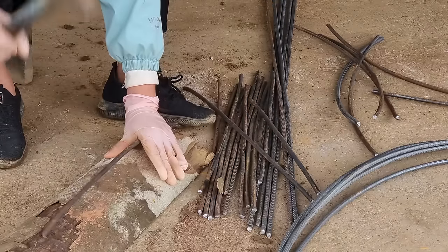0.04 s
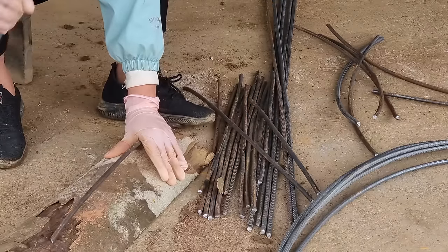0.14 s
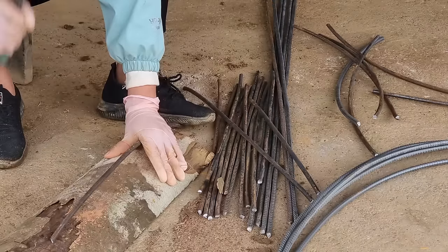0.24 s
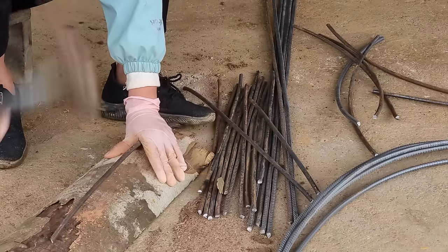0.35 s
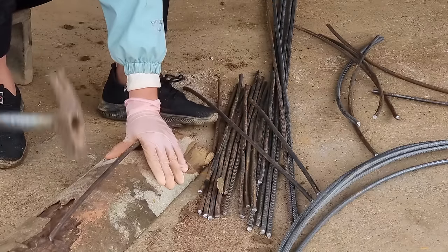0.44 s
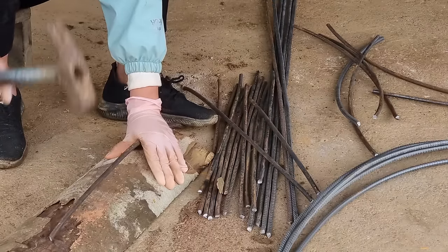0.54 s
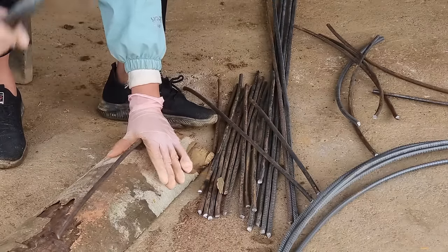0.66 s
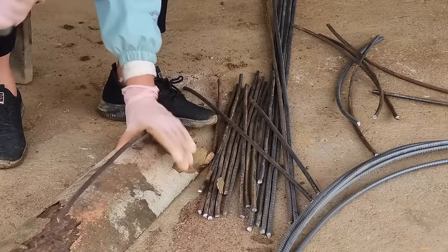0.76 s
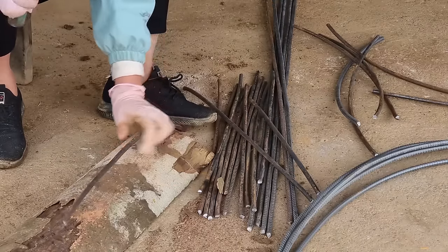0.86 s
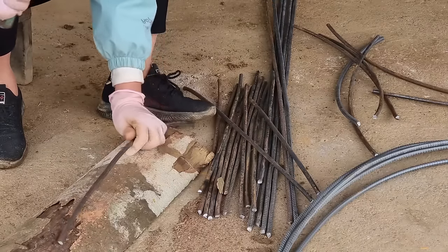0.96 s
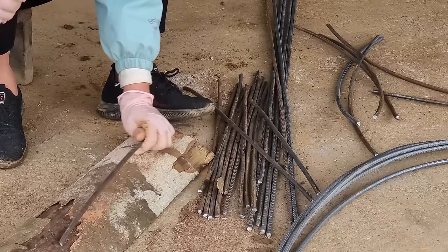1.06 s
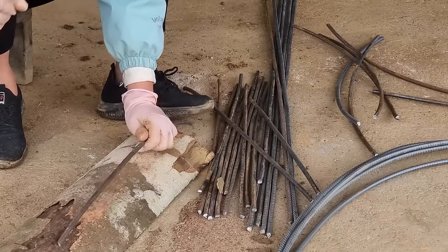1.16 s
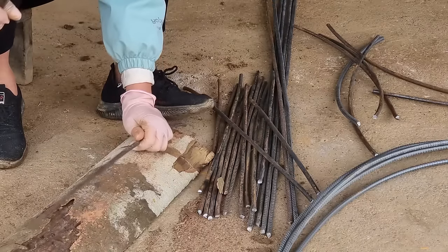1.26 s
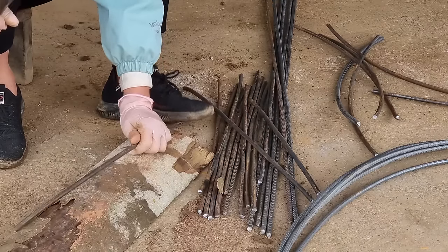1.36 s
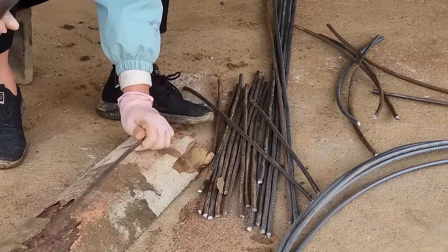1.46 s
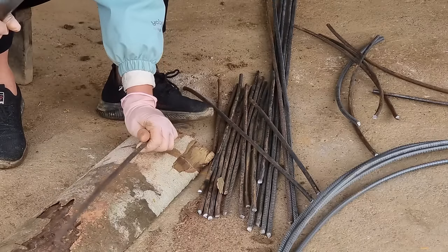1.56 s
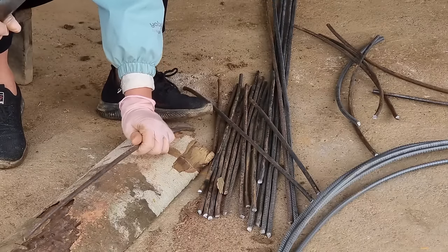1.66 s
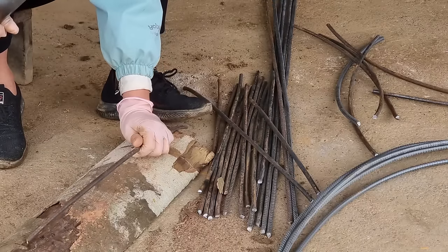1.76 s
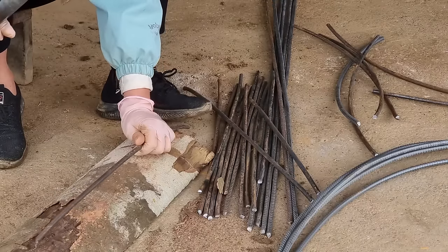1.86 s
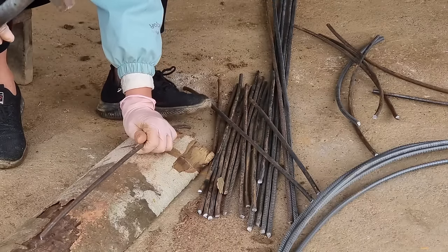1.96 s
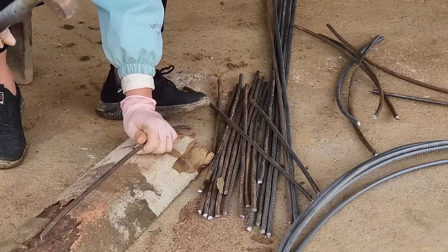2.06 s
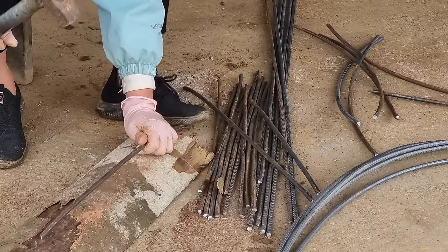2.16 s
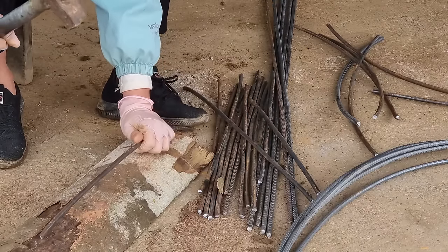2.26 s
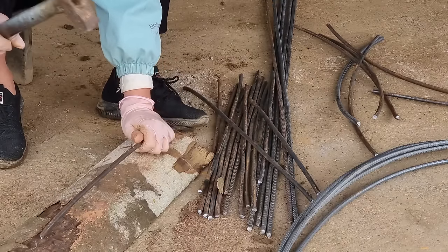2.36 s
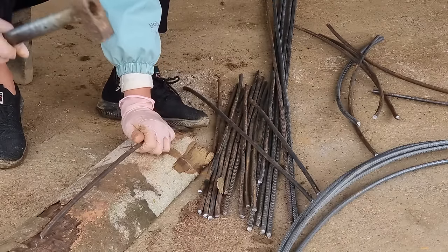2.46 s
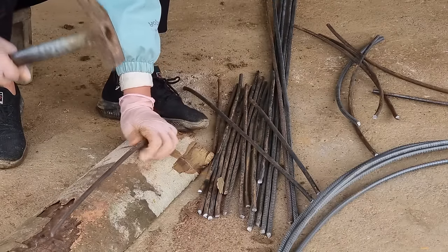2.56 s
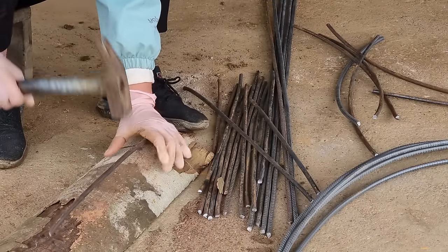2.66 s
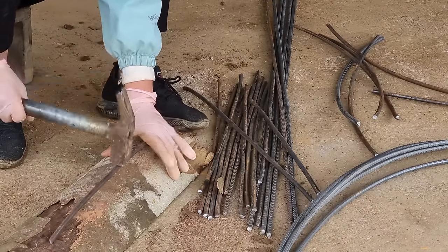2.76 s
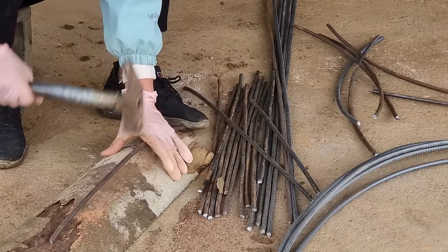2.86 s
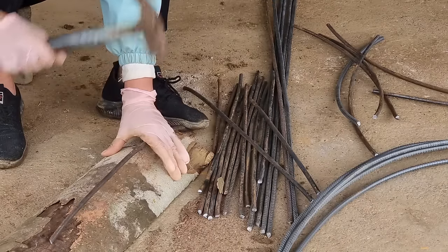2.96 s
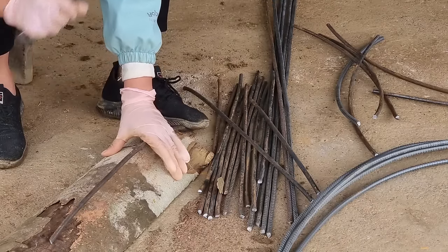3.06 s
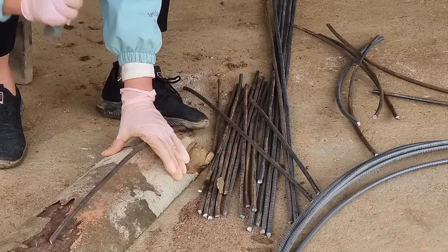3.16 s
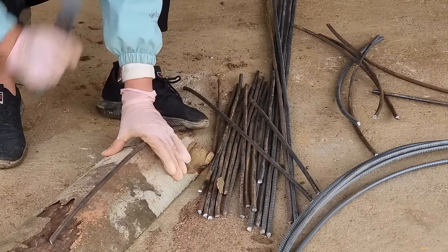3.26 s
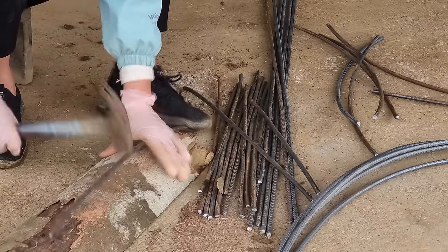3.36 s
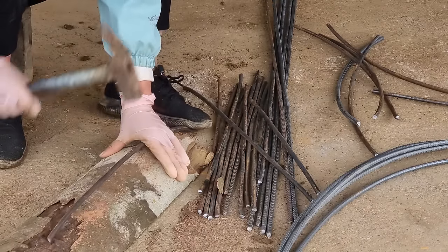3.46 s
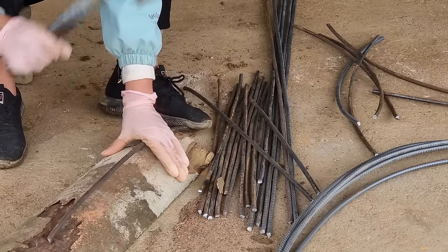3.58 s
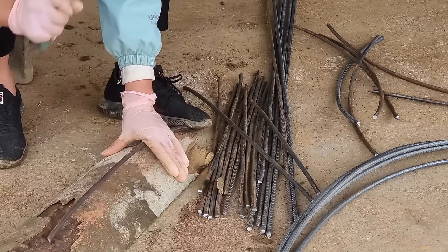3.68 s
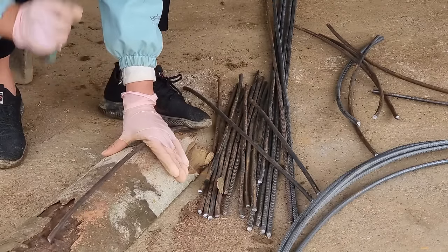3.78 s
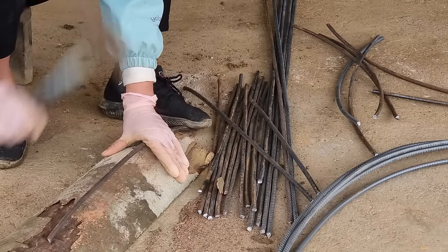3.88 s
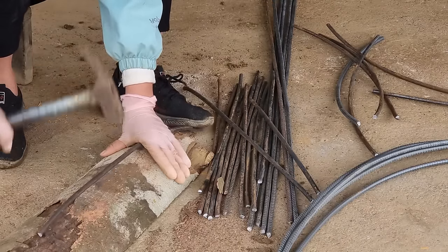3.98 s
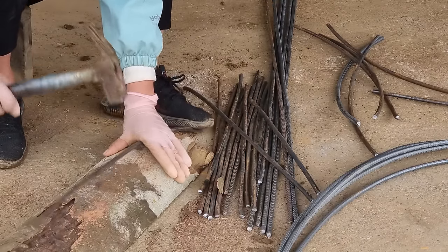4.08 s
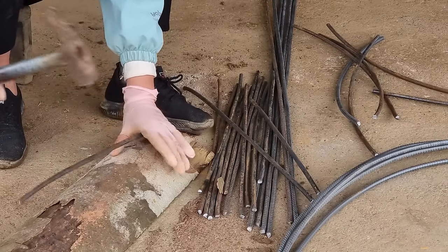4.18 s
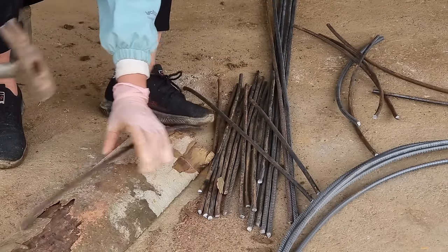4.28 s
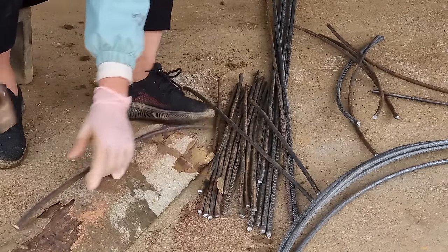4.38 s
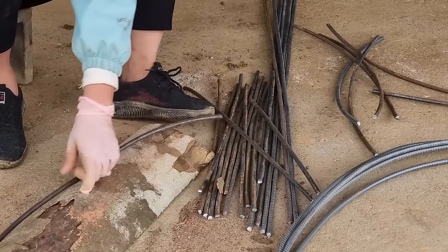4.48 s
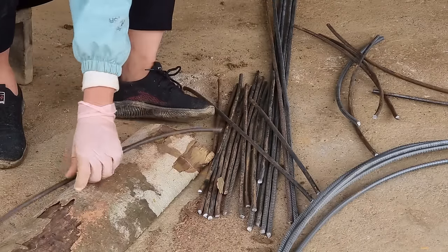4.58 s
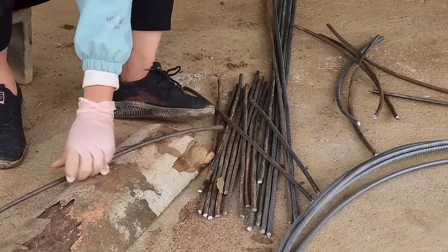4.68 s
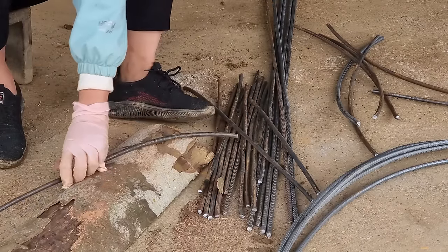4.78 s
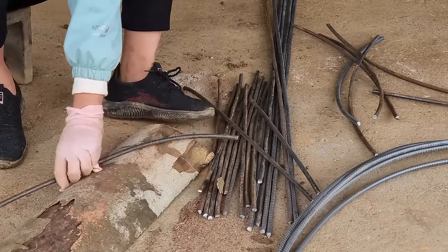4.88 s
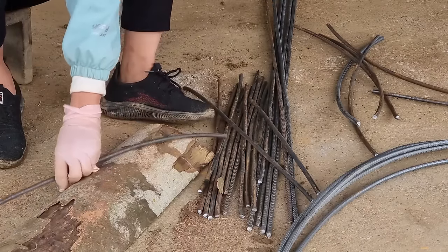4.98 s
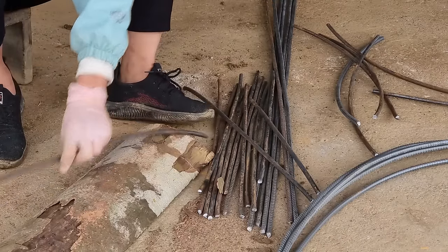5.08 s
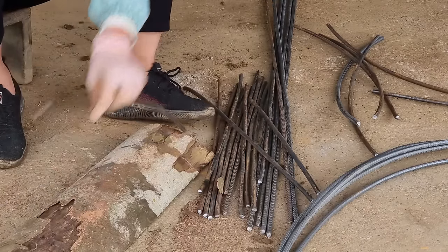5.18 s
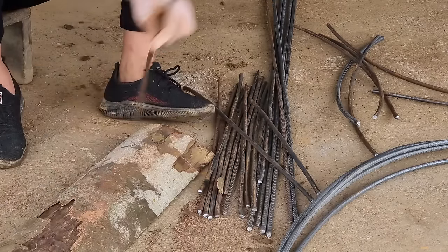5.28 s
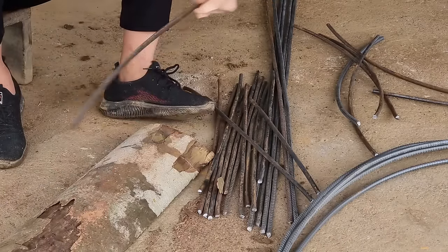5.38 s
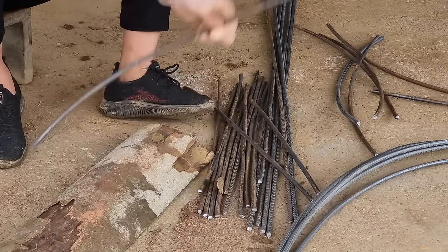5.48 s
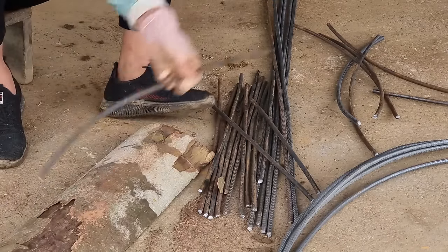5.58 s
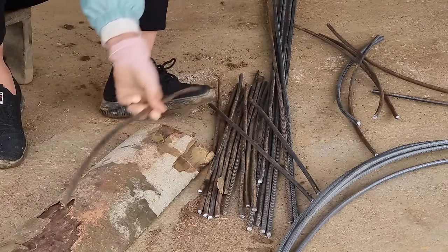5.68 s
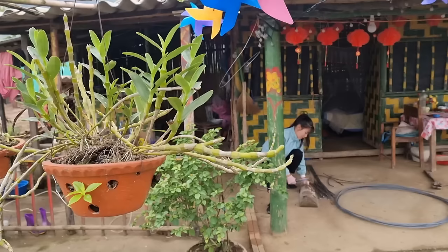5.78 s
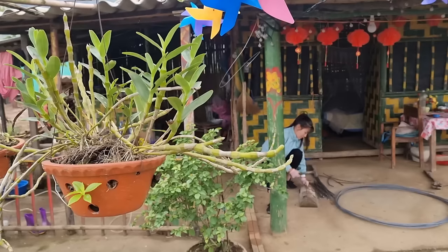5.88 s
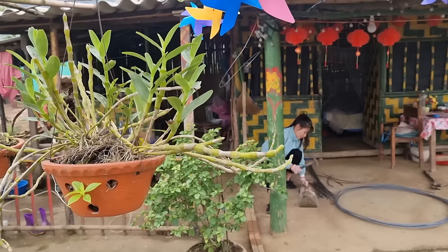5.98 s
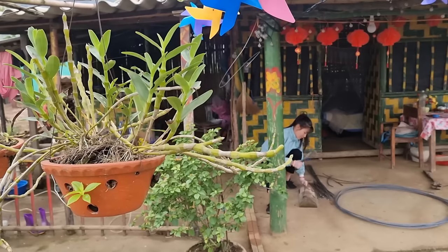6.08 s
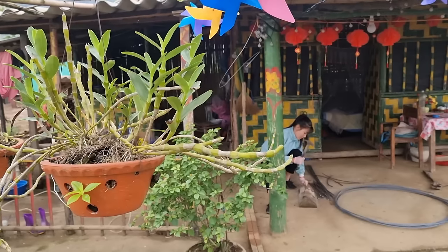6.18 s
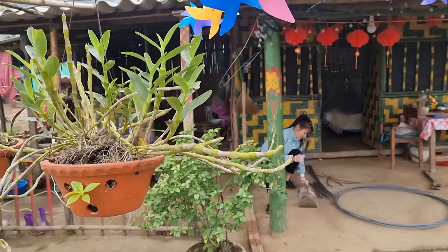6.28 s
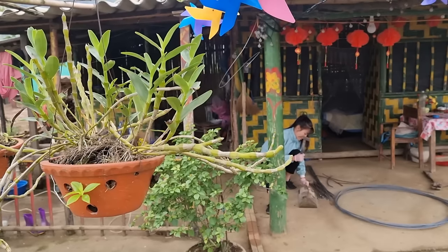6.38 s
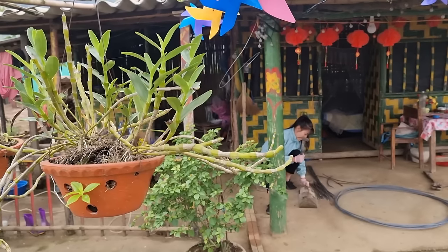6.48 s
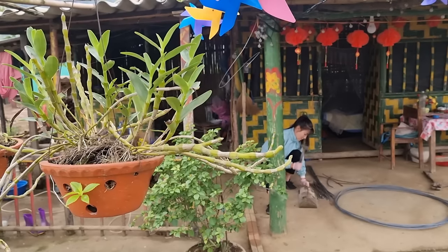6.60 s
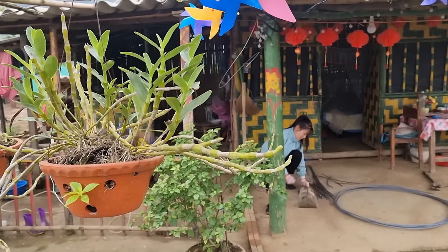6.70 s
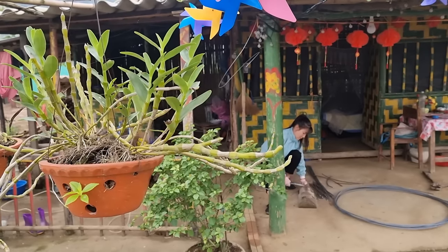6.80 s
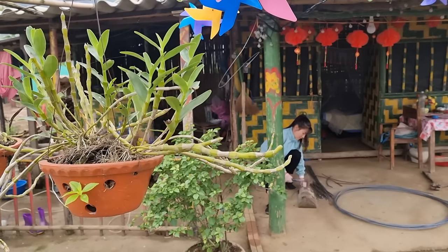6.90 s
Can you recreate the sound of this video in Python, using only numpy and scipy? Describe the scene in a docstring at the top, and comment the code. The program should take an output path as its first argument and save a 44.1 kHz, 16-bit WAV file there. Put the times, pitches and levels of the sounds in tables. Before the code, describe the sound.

Irregular hard hammer blows make a steel rod chatter on wood; it drags away ringing, then quieter yard air, a far bird, one more blow.

```python
"""Over a faint low rumble and open air, glove and sleeve brush and a steel reinforcing rod is tapped on a log.
A hammer straightens it: filtered noise and ringing modes make each blow chatter on the wood. The rod is turned,
dragged off the log ringing as beating sines, and laid down. The sound drops out briefly and the scene changes:
the work is heard from across the yard, where a far bird, one gliding sine, calls and the hammer falls again."""
import sys
import numpy as np
from scipy import signal
from scipy.fft import rfft, irfft, next_fast_len
from scipy.io import wavfile
from scipy.ndimage import uniform_filter1d, map_coordinates

SR = 44100
rng = np.random.default_rng(int(sys.argv[2]) if len(sys.argv) > 2 else 0)


def int16_out(signal):
    """Quantize to a 16-bit WAV file."""
    q = np.round(np.clip(np.atleast_2d(signal).T, -1, 1) * 32767)
    wavfile.write(sys.argv[1], SR, q.astype(np.int16))


N = 306054

# Noise spectrum of rod clattering on wood. Each row: frequency in Hz, relative density in dB per Hz.
CLATTER_SPECTRUM = [(29, -49.5), (50, -15.5), (198, -14), (461, -19.5), (572, -11.5), (842, -8), (1210, -5),
                    (1700, -8.5), (2110, -10.5), (2440, -9), (5670, -24), (7950, -27.5), (12900, -27),
                    (16000, -31.5)]
# Noise spectrum of gritty rubbing. Each row: frequency in Hz, relative density in dB per Hz.
GRIT_SPECTRUM = [(1180, -30), (2000, -3), (3710, -6), (5160, -4.5), (6760, -11), (14300, -13.5),
                 (16000, -17)]

PAUSE_START_S, PAUSE_END_S = 5.742, 5.799
# The two listening places: lead of the left port (s), L-R (dB), treble slope of a blow (dB/octave),
# clatter against crack (dB), stretch of a tap's decay, mean levels of the yard (dB)
NEAR = dict(lead_s=8e-5, pan_db=.5, slope_db=2.5, clatter_db=-6.5, stretch=0.99,
            rumble_db=-65, air_db=-72, hiss_db=-76)
FAR = dict(lead_s=-0.000086, pan_db=-1.5, slope_db=0.7, clatter_db=-2, stretch=1.41,
           rumble_db=-69.5, air_db=-73.5, hiss_db=-86.5)


def amp(db):
    """Decibels to gain."""
    return 10 ** (np.asarray(db) / 20)


def unit(x):
    """Scaled to rms 1."""
    return x / np.sqrt(np.mean(x ** 2) + 1e-20)


def wobble(rate, size=N):
    """A smooth random curve, rate knots a second."""
    knots = rng.standard_normal(int(size * rate / SR) + 4)
    return map_coordinates(knots, [np.arange(size) * rate / SR])


def filtered(x, response):
    """x times a response of frequency."""
    n = x.shape[-1]
    m = next_fast_len(n + 8192)
    return irfft(rfft(x, m) * response(np.fft.rfftfreq(m, 1 / SR)), m)[..., :n]


def noise(spectrum, apart, size=N):
    """Stereo noise of rms 1; apart is the side-to-mid ratio in the treble, shrinking for long waves."""
    f, db = np.transpose(spectrum)

    def colour(hz):
        gain = amp(np.interp(np.log(hz + 1), np.log(f + 1), db))
        return gain * [np.ones_like(hz), apart * (hz + 130) / (hz + 600)]
    mid, side = filtered(rng.standard_normal((2, size)), colour)
    return unit(np.array([mid + side, mid - side]))


def gesture(s, rise, hold, t60):
    """An envelope that rises from time s, starts to die away hold seconds after s, and falls 60 dB per t60."""
    age = np.arange(N) / SR - s
    return np.clip(age / rise, 0, 1) * amp(-60 * np.maximum(age - hold, 0) / t60)


def add(track, sound, s):
    """Mix a sound in from time s."""
    start = round(s * SR)
    part = sound[:, max(-start, 0):N - start]
    track[:, max(start, 0):][:, :part.shape[1]] += part


def place(s):
    """The work is heard from close by before the brief silence and from across the yard after it, when the
    scene changes."""
    return NEAR if s < PAUSE_START_S else FAR


def placed(sound, s):
    """The nearer port hears the work sooner and louder."""
    spot, ports = place(s), np.array([[.5], [-.5]])
    advanced = filtered(sound, lambda hz: np.exp(2j * np.pi * hz * spot["lead_s"] * ports))
    return advanced * amp(spot["pan_db"] * ports)


def crowded(x, depth_db, spacing_hz):
    """A long ribbed rod has many more weak resonances than the named ones: they make the spectrum jagged."""
    def peaks(hz):
        knot = np.log1p(hz / 3000) * 3000 / spacing_hz  # they lie further apart in the treble
        return amp(depth_db * map_coordinates(rng.standard_normal(int(knot[-1]) + 4), [knot]))
    return unit(filtered(x, peaks))


def slapping(x, note_hz):
    """The loose span slaps the wood, which broadens its note to a hump in the clatter's spectrum."""
    height_db, half_width_octaves = 5.5, 0.16

    def hump(hz):
        octaves = np.log2((hz + 1) / note_hz)
        return amp(height_db * np.exp(-.5 * (octaves / half_width_octaves) ** 2))
    return unit(filtered(x, hump))


def voiced(sound, levels_db, slope_db):
    """Where and how hard the rod is hit sets each register (thud, knock, ring, clank, sizzle) and treble slope."""
    # Upper edges of all registers but the top one. Each entry: frequency in Hz.
    edges_hz = [450, 900, 1700, 4000]
    out = 0
    rest = filtered(sound, lambda hz: amp(slope_db * np.log2(np.maximum(hz / edges_hz[-1], 1))))
    for edge, db in zip(edges_hz + [SR], levels_db):
        band = filtered(rest, lambda hz: 1 / (1 + (hz / edge) ** 12))
        rest = rest - band
        loudest = uniform_filter1d(np.mean(band ** 2, axis=0), size=1024).max()
        out = out + band * amp(db) / np.sqrt(loudest)
    return out


def ringing(t, hold, t60, note_hz, note_db, scatter_db=3, apart=1.0):
    """Rod and log ring as decaying sines, out of phase between ports; chatter feeds them for hold seconds."""
    # Modes of the log on the ground (lowest four) and the rod on it. Each row: frequency in Hz, mean level in dB.
    log_modes = [(72, -16.5), (135, -14.5), (205, -14.5), (310, -20.5), (579, -5.5), (680, -8.5),
                 (934, -10.5), (1012, -11), (1092, -3), (1176, -9.5), (1255, 6), (1330, -8.5), (1445, -1.5),
                 (1586, -6.5), (1862, -10), (2004, -6.5), (2130, -6), (2299, -6), (2718, -12.5),
                 (3100, -10.5), (3408, -21.5), (4404, -22), (4700, -16.5), (6350, -23.5), (10500, -22.5),
                 (12550, -17), (13134, -22)]
    out, age = 0, np.maximum(t, 0)
    for hz, db in [*log_modes, (note_hz, note_db)]:
        ports = apart * rng.standard_normal((2, 1)) * hz / (hz + 500)
        blur = (.3 + 1.1 * (age < hold)) * wobble(70, size=len(t))  # slaps on the wood disturb the phase
        phase = rng.uniform(0, 2 * np.pi) + ports + uniform_filter1d(blur, size=128)
        level = amp(db + scatter_db * rng.standard_normal())
        out = out + level * np.sin(2 * np.pi * hz * age + phase)
    decay = amp(-60 * (age - 0.46 * np.minimum(age, hold)) / t60)  # slower while fed
    return out * decay * (1 - np.exp(-age / 0.00042))


def yard():
    """A low distant rumble, open air and a thin hiss: noises of fixed mean level at each listening place."""
    # Noise spectra of rumble, air and hiss. Each row: frequency in Hz, relative density in dB per Hz.
    rumble_spectrum = [(12, -28), (20, -2), (38, -4), (70, 3), (130, -4.5), (161, -6.5), (187, -8.5),
                       (214, -14), (262, -20), (500, -26), (650, -59), (1100, -120)]
    air_spectrum = [(150, -27), (250, 0.5), (458, -12), (529, -8.5), (869, -5.5), (4500, -21),
                    (5850, -46.5), (9900, -120)]
    hiss_spectrum = [(1760, -30), (3000, -4), (7250, -4), (9800, -7.5), (14800, -7.5), (16000, -12)]
    near = np.arange(N) / SR < PAUSE_START_S
    level = lambda name: amp(np.where(near, NEAR[name], FAR[name]))
    rumble = level("rumble_db") * amp(1.3 * wobble(4.6)) * noise(rumble_spectrum, apart=0.6)
    air = level("air_db") * amp(0.5 * wobble(36)) * noise(air_spectrum, apart=1.0)
    hiss = level("hiss_db") * noise(hiss_spectrum, apart=.8)
    return rumble + air + hiss


def brushes():
    """Glove and sleeve slide over the rod and the wood: gritty noise in bell-shaped strokes."""
    # Each row: centre in seconds, level in dB, half length in seconds.
    stroke_rows = [(.01, -61.5, 0.023), (0.291, -69.5, 0.08), (0.758, -69.5, .025), (1.408, -61.5, 0.026),
                   (2.579, -59, 0.023), (2.984, -68, 0.12), (3.248, -60, 0.036), (3.812, -65.5, 0.036)]
    t = np.arange(N) / SR
    strokes = sum(amp(db) * np.exp(-.5 * ((t - s) / half) ** 2) for s, db, half in stroke_rows)
    return strokes * amp(0.82 * wobble(300)) * noise(GRIT_SPECTRUM, apart=0.93)


def taps():
    """Light knocks as the rod is turned and shifted and the hammer is rested; grittier contacts are brighter."""
    # Light contacts. Each row: start in seconds, levels in dB of wooden knock, steel clink and gritty scratch,
    # note of the loose span in Hz.
    contact_rows = [(0.121, -61.5, -87, -88, 1396), (0.737, -59, -78.5, -63, 1244),
                    (0.965, -32.5, -53.5, -65, 1304), (1.361, -46, -60.5, -72.5, 1143),
                    (1.639, -59, -53, -53, 1470), (2.159, -62, -66.5, -78, 707),
                    (2.255, -66.5, -80, -85, 1317), (2.339, -56.5, -72.5, -80, 1380),
                    (4.278, -38, -52, -54, 1266), (4.36, -47.5, -71, -73, 1232),
                    (4.38, -47, -78, -64.5, 603), (4.51, -48, -49, -59, 1257), (4.592, -57, -58, -73, 1215),
                    (4.983, -54, -46, -27.5, 4090), (5.047, -57.5, -61, -53, 1510),
                    (5.8, -40.5, -35.5, -38, 3044), (5.86, -47.5, -52, -58.5, 820),
                    (5.94, -55, -46, -57.5, 2690), (6.334, -49.5, -69, -72, 1350),
                    (6.877, -41, -40, -53.5, 1350)]
    thud_db, knock_db = -11.5, -5  # the log's low registers against its ring
    base_t60_s, click_t60_s, rise_s = 0.13, 0.017, .003
    base_slope_db, slope_per_grit = -1, 0.47  # dB/octave, and its rise per dB of grit over steel
    out, t = np.zeros((2, N)), np.arange(SR // 3) / SR
    for s, wood_db, steel_db, grit_db, note_hz in contact_rows:
        t60 = base_t60_s * place(s)["stretch"]
        levels = [wood_db + thud_db, wood_db + knock_db, wood_db, steel_db, grit_db]
        slope_db = base_slope_db + slope_per_grit * (grit_db - steel_db)
        touch = 1 - np.exp(-t / rise_s)
        fade = amp(-60 * t / click_t60_s) + amp(-3.5 - 60 * t / t60)
        clatter = crowded(noise(CLATTER_SPECTRUM, apart=0.87, size=len(t)), depth_db=4.5, spacing_hz=40.7)
        click = slapping(clatter, note_hz) * fade
        note_db = 8 - 7.8 * abs(np.log2(note_hz / 1300))  # very short or long spans ring less
        ring = ringing(t, 0, t60=t60, note_hz=note_hz, note_db=note_db)
        contact = touch * (click + amp(-12.5) * ring)
        add(out, placed(voiced(contact, levels, slope_db), s), s)
    return out


def hammer():
    """A short noise rises just before each crack, the rod chatters on the wood, and the clatter dies in the yard."""
    # Each row: crack in seconds, levels in dB of thud, knock, ring, clank and sizzle,
    # note of the rod's loose span in Hz, rise before the crack, chatter and crack t60 in seconds.
    blow_rows = [(0.382, -31.5, -27, -19, -22, -18, 1176, 0.021, 0.034, 0.084),
                 (2.765, -44, -33, -15, -21.5, -24, 2094, 0.0042, 0.0045, 0.07),
                 (3.349, -34.5, -26, -16, -19, -20, 1241, 0.027, 0.045, 0.14),
                 (3.919, -38, -32.5, -13, -26.5, -23, 1160, 0.029, 0.031, 0.076),
                 (6.764, -36, -24.5, -22.5, -15, -21.5, 1398, 0.01, 0.029, 0.16)]
    body_t60_s, treble_t60_s, treble_from_hz = 0.22, .16, 5000  # clatter dies sooner in the treble
    thud_cycles = 1.3  # a brief blow cannot drive waves that fit fewer cycles into its chatter
    lead_s = .05  # room for the rise before the crack
    out = np.zeros((2, N))
    t = np.arange(SR // 2) / SR - lead_s
    age = np.maximum(t, 0)
    for s, *levels, note_hz, rise, chatter, crack_t60 in blow_rows:
        spot = place(s)
        crack = amp(-60 * age / crack_t60)
        after = np.maximum(age - chatter, 0)
        fade = lambda t60: np.hypot(crack, amp(spot["clatter_db"] - 60 * after / t60))
        rise_db = -6.5 + 17 * np.minimum(t, 0) / rise - 7 * (t / rise) ** 2
        onset = np.where(t < 0, amp(rise_db), 1)
        grain = amp(2.2 * wobble(450, size=len(t)))  # single slaps of the rod within the chatter
        clatter = crowded(noise(CLATTER_SPECTRUM, apart=0.66, size=len(t)), depth_db=4.0, spacing_hz=34.2)
        clatter = slapping(clatter, note_hz)
        body = filtered(clatter, lambda hz: 1 / (1 + (hz / treble_from_hz) ** 2))
        treble = clatter - body
        crash = (body * fade(body_t60_s) + treble * fade(treble_t60_s)) * onset * grain
        ring = ringing(t, chatter, t60=0.13, note_hz=note_hz, note_db=2.3) * np.hypot(crack, amp(-4.5))
        lowest_hz = thud_cycles / chatter
        blow = filtered(crash + amp(-2) * ring, lambda hz: hz ** 2 / np.hypot(hz ** 2, lowest_hz ** 2))
        add(out, placed(voiced(blow, levels, spot["slope_db"]), s), s - lead_s)
    return out


def free_rod():
    """Knocks set the rod singing in bending modes, some in beating pairs, until wood or hand stops it."""
    # Bending modes of the free rod. Each row: frequency in Hz, mean level in dB before the knock's gain.
    bending_modes = [(1110, -67), (1640, -73), (2266, -66), (2347, -69), (3060, -71), (3122, -67.5),
                     (3900, -73), (3984, -68), (4860, -75), (4985, -73), (5879, -79), (6050, -75),
                     (7192, -74), (8436, -81), (9700, -85), (10977, -87), (12468, -81), (14309, -84)]
    # Each row: start in seconds, gain in dB, time free in seconds, brightest frequency in Hz.
    knock_rows = [(.40, 5.5, 0.13, 3050), (4.508, 7, 0.385, 3380), (4.984, 12.5, 0.083, 5540)]
    rise_s, ring_t60_s, stopped_t60_s = .015, 2.9, 0.12  # the ring decay goes on under the stopping
    focus_db = 2.5  # loss per octave from the brightest frequency
    t, tones, swings = np.arange(N) / SR, 0, []
    for s, db, free, bright_hz in knock_rows:
        decay = amp(db - 60 * np.maximum(t - s, 0) / ring_t60_s)
        swings.append((gesture(s, rise_s, free, stopped_t60_s) * decay, bright_hz))
    for hz, db in bending_modes:
        swing = sum(level * amp(-focus_db * abs(np.log2(hz / bright_hz))) for level, bright_hz in swings)
        waver = .6 * wobble(18) + .25 * wobble(120)
        phase = 2 * np.pi * hz * t + waver + rng.normal(0, .8, (2, 1))
        tones = tones + swing * amp(db + 3.5 * wobble(11)) * np.sin(phase)
    return amp(1.4 * wobble(27)) * tones


def drag():
    """In each scrape, at a new spot on the log, the ribs of the rod bump over the wood and grind on grit."""
    # Each row: start and length in seconds, levels in dB of wood and grit,
    # lowest frequency in Hz (a lighter touch stirs fewer low resonances).
    scrape_rows = [(1.838, .08, -68, -83.5, 1250), (4.292, 0.14, -49.5, -82, 300),
                   (4.383, 0.05, -68, -61, 400), (4.435, 0.069, -51.5, -64.5, 450),
                   (4.518, 0.091, -54, -64, 500), (4.673, 0.05, -54, -68, 660),
                   (4.817, 0.06, -58, -58.5, 395), (5.094, 0.1, -57.5, -60, 1090)]
    # Noise spectrum of the rubbed wood. Each row: frequency in Hz, relative density in dB per Hz.
    wood_spectrum = [(300, -9), (470, -14), (580, 5.5), (690, 2), (800, -22.5), (1100, -3), (1280, 2),
                     (1600, 0), (2200, -16.5), (3500, -21.5), (6000, -22), (12000, -79)]
    rise_s, t60_s = 0.0051, 0.095
    bumps_per_s, bump_t60_s, bump_db = 25, 0.11, -3.5  # ribs catching on bark, against the steady rubbing
    out, t = np.zeros((2, N)), np.arange(SR // 3) / SR
    for s, length, wood_db, grit_db, lowest_hz in scrape_rows:
        push = gesture(0, rise_s, length, t60_s)[:len(t)]
        catches = rng.random(len(t)) < bumps_per_s / SR
        jolts = signal.fftconvolve(catches * 1.0, amp(-60 * t / bump_t60_s))[:len(t)]
        bumps = unit(1 + amp(bump_db) * jolts)
        rubbing = crowded(noise(wood_spectrum, apart=0.37, size=len(t)), depth_db=7.5, spacing_hz=30.47)
        rubbing = unit(filtered(rubbing, lambda hz: hz ** 4 / (hz ** 4 + lowest_hz ** 4)))
        wood = bumps * amp(1.94 * wobble(105.5, size=len(t))) * rubbing
        grit = amp(1.0 * wobble(510, size=len(t))) * noise(GRIT_SPECTRUM, apart=0.86, size=len(t))
        add(out, placed(push * (amp(wood_db) * wood + amp(grit_db) * grit), s), s)
    return out


def bird():
    """A far, slightly hoarse call: one sine with jittered pitch that rises and falls back."""
    # Pitch of the call. Each row: time in seconds, frequency in Hz.
    pitch_rows = [(6.06, 1381), (6.138, 1445), (6.182, 1634), (6.32, 1689), (6.37, 1630), (6.41, 1380),
                  (6.502, 1367), (6.56, 1440)]
    s, pitch_hz = np.transpose(pitch_rows)
    hz = np.interp(np.arange(N) / SR, s, pitch_hz)
    phase = 2 * np.pi * np.cumsum(hz * (1 + 0.00902 * wobble(200))) / SR
    call = gesture(s[0], rise=0.024, hold=.42, t60=0.43)
    level_db = -65.5 + 2.5 * wobble(35)
    return call * amp(level_db) * np.sin(phase)


def scene():
    """Everything together, silent for a moment where the scene changes."""
    t = np.arange(N) / SR
    heard = (t < PAUSE_START_S) | (t > PAUSE_END_S)
    return (yard() + brushes() + taps() + hammer() + free_rod() + drag() + bird()) * heard


def record(dry):
    """The recorder rounds off the highest peaks, sheds the deepest bass and cuts steeply above its band limit."""
    ceiling, top_hz, bass_hz = .9, 16100, 40
    rounded = dry / (1 + np.abs(dry / ceiling) ** 6) ** (1 / 6)

    def band(hz):
        return 1 / (1 + (hz / top_hz) ** 200) * hz ** 2 / np.hypot(hz ** 2, bass_hz ** 2)
    return filtered(rounded, band)


dry = scene()
out = record(dry)
int16_out(out)
```